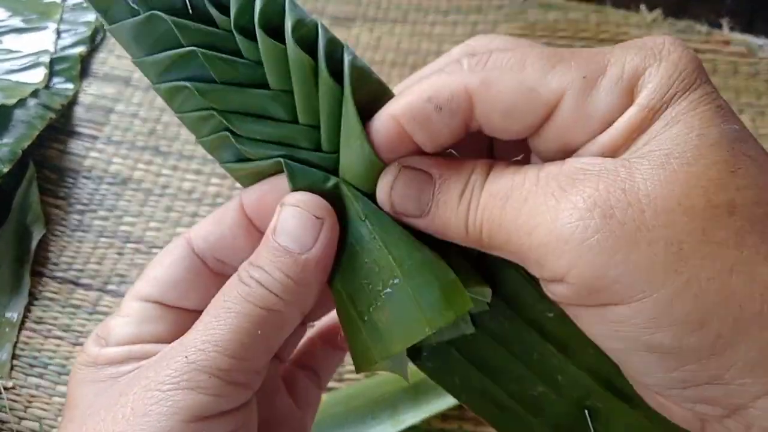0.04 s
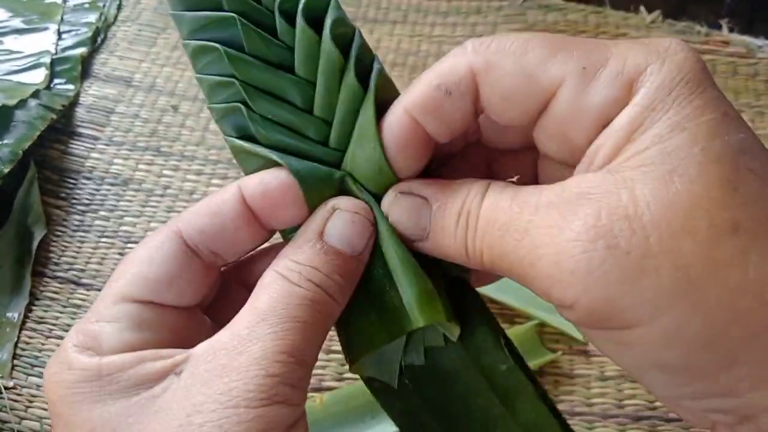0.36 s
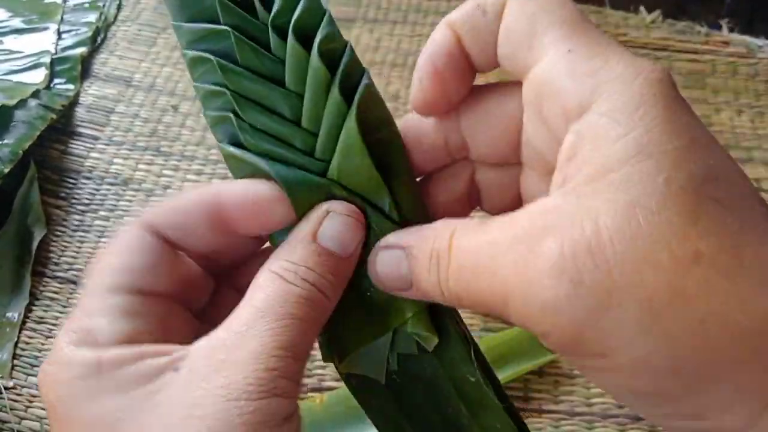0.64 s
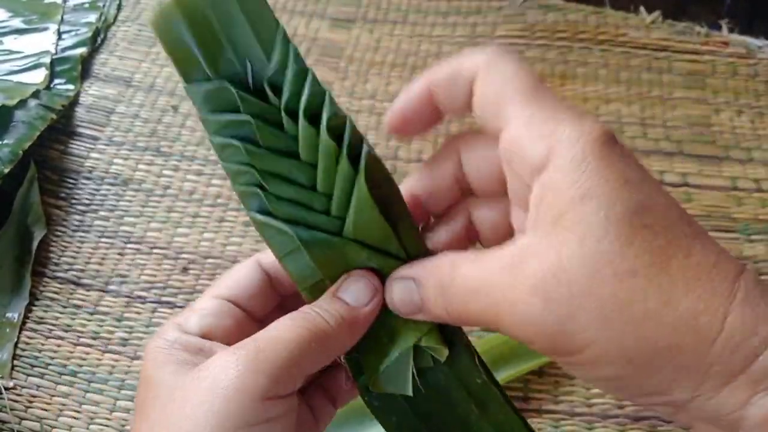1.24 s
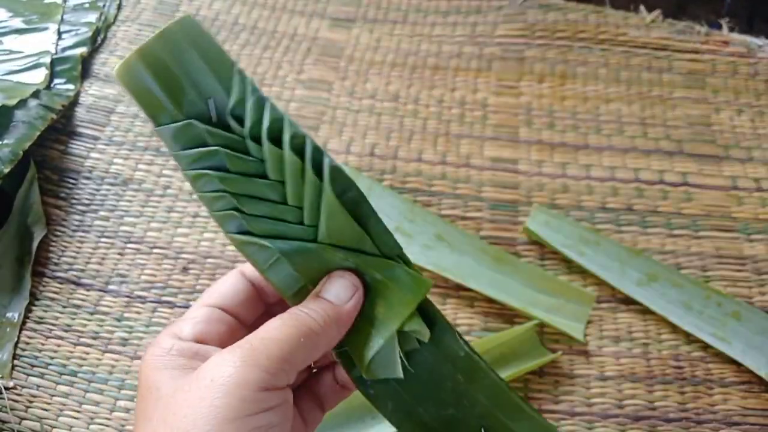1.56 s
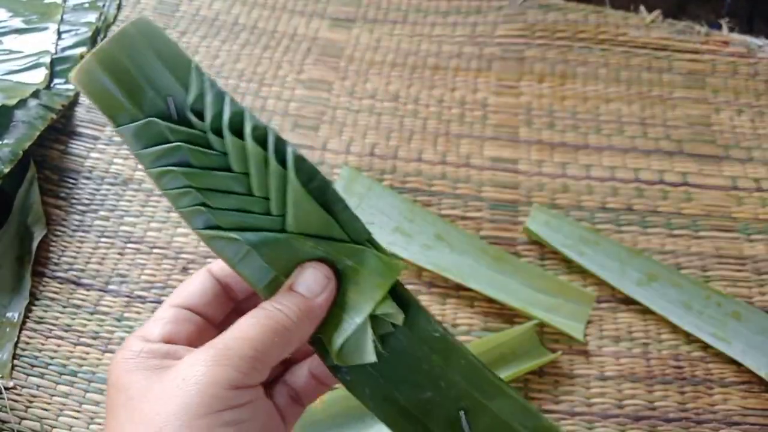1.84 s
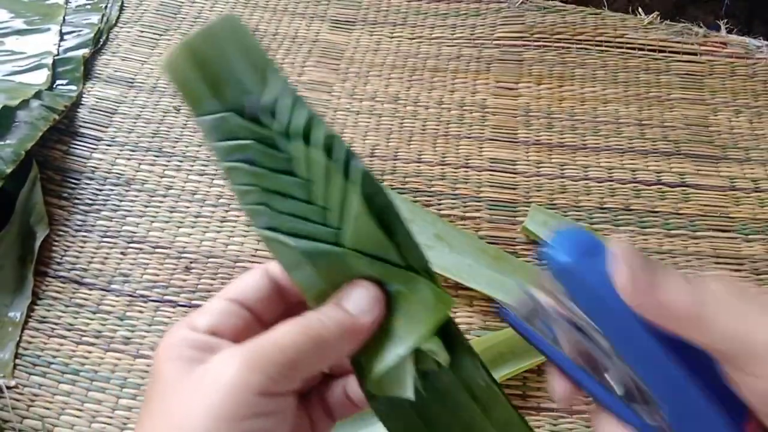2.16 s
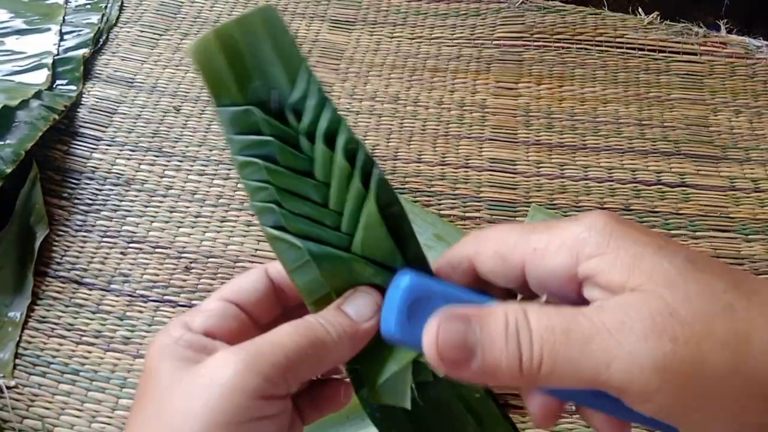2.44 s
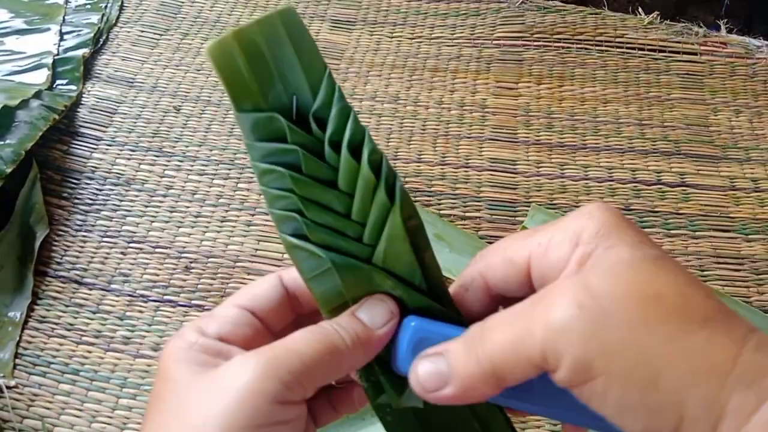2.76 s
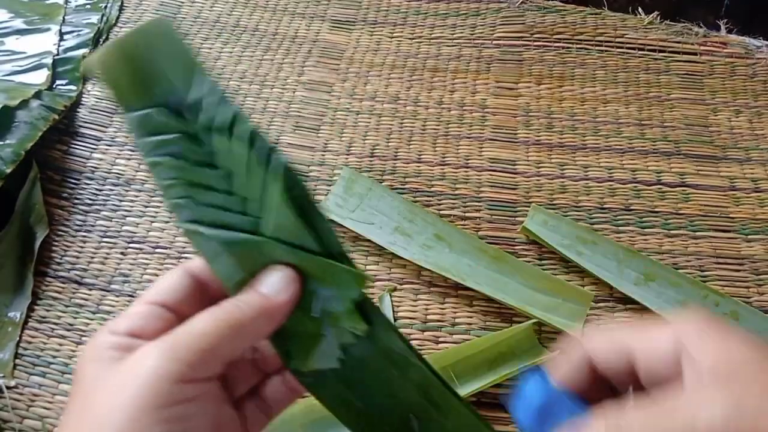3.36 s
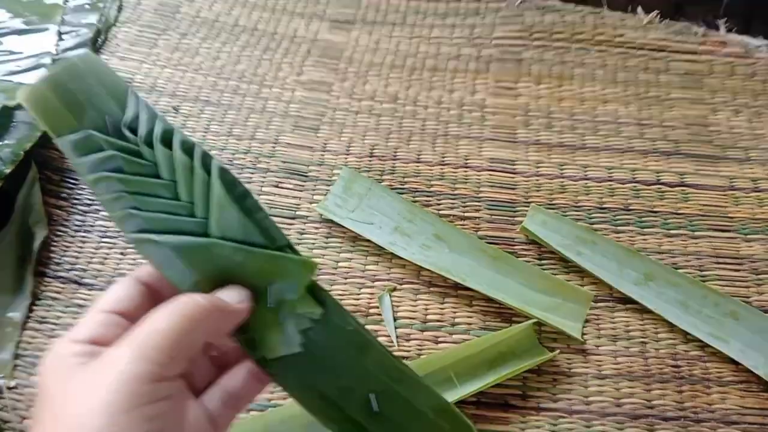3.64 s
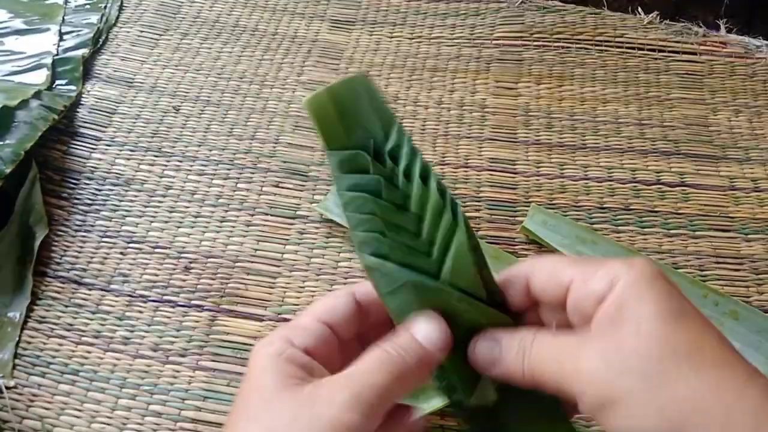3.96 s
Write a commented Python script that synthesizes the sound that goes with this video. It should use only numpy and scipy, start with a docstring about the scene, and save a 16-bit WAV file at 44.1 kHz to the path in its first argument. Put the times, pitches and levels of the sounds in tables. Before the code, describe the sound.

Close, sharp stapler snaps bite twice through a leaf after some light rustling, followed by a dull thump as the stapler lands on a mat. Far-off knocks like wood chopping sound now and then in the quiet room.

```python
"""Far-off wooden knocks, like chopping, and a leaf rustling between fingers open the scene.
Then, up close, a small hand stapler bites twice into the folded leaf: steel scrapes, gives way with a
crack that rings the shell, and springs back with a rattle. It is put down on a straw mat, and the floor
booms underneath. The distant wood is struck five times in all and rings on in the room after each blow.
Faint scuffs and a quiet hum and hiss sit behind everything."""
import sys
import numpy as np
from scipy import signal
from scipy.fft import rfft, irfft
from scipy.io import wavfile
from scipy.ndimage import uniform_filter1d, map_coordinates

SR = 44100
rng = np.random.default_rng(int(sys.argv[2]) if len(sys.argv) > 2 else 0)


def wav_out(sig):
    """Save sig, one row per channel (or a flat mono array), as 16-bit PCM at SR to the path in sys.argv[1]."""
    wavfile.write(sys.argv[1], SR, np.round(np.clip(np.atleast_2d(sig).T, -1, 1) * 32767).astype(np.int16))


N = 176400
T = np.arange(int(.6 * SR)) / SR  # seconds within one hit

# Stapler snaps. Each row: start in seconds, level in dB, crunch time in seconds,
# tilt in dB per octave, tail level in dB, scrape level in dB.
SNAPS = [(2.0439, -12.5, 0.0017, 7, -50.5, -35.5), (2.5587, -2, 0.00099, 0, -40, -33.5),
         (2.591, 1, 0.0035, 2.5, -15.5, -46.5), (2.807, 0, 0.0018, 1, -23.5, -23.5),
         (2.872, -20.5, 0.00072, 0.5, -35.5, -42), (2.9371, -2.5, 0.0009, -1.5, -45, -29.5),
         (2.965, -4.5, 0.0017, 4, -18, -35.5), (3.1611, 0.5, 0.0024, 1, -22.5, -20),
         (3.534, -14.5, 0.0035, 1, -40, -49), (3.595, -4, 0.0043, 0.5, -24.5, -54.5)]
# The tones of the stapler's shell and of its spring. Each row: pitch in Hz, level in dB.
SHELL_MODES = [(1560, -8.5), (2080, -2), (2650, -5), (6500, -7), (7150, -6.5)]
SPRING_MODES = [(2050, -8), (2114, -6.5), (2181, -11), (2676, -9), (7060, -11)]
# The colour of the crack, and of the scrape and rattle. Each row: frequency in Hz, gain in dB.
CRACK_EQ = [(100, -16.5), (900, -5), (2200, 8), (4600, -2), (6600, 2.5), (8500, -6), (13000, -18.5),
            (15300, -19)]
RATTLE_EQ = [(600, -24), (1300, -9), (2100, 3), (4600, -5), (7200, -3), (8300, -14.5), (13300, -30),
             (15300, -22)]
# Low thumps: the stapler's push as it bites, then its bumps on the mat.
# Each row: start in seconds, level in dB, slap offset in dB.
THUMPS = [(2.593, -30.5, -4), (3.488, -23.5, -11.5), (3.539, -20, -5.5), (3.614, -31, 10),
          (3.6319, -8.5, -2), (3.671, -24.5, 2)]
# The floor booming under the mat. Each row: pitch in Hz, level in dB, t60 in seconds.
FLOOR_MODES = [(126.3, 3, 0.18), (177.5, 9.5, 0.052)]
# The dull slap of a thump. Each row: frequency in Hz, gain in dB.
SLAP_EQ = [(60, -13.5), (200, 5), (480, -1), (1000, -19), (12000, -37)]
# Distant chops. Each row: start in seconds, noise level in dB, tilt in dB per octave, main note in Hz,
# note level in dB, ring level in dB, ring centre in Hz, t60 in seconds.
CHOPS = [(0.143, -18.5, -0.7, 820, -12.5, -20, 624, 0.26),
         (0.926, -17.5, -0.3, 960, -14.5, -20.5, 690, 0.24), (2.166, -17, 0.5, 932, -7, -14, 1300, 0.18),
         (3.005, -17, 1.9, 938, -9, -13.5, 1380, 0.27), (3.824, -11.5, 1.45, 941, -12, -9, 1500, 0.31)]
# The tones of the struck wood. Each row: pitch in Hz, level in dB.
WOOD_MODES = [(522, 0), (678, -10), (1132, -4), (1249, -4.5), (1780, -9), (1947, -4), (2055, -9),
              (2281, -4), (2324, -5), (4220, 5)]
# The colour of a chop's noise. Each row: frequency in Hz, gain in dB.
CHOP_EQ = [(60, -12.5), (120, -3), (270, -15), (550, -0.5), (1250, 2.5), (1600, -3), (1950, 4), (2600, -8),
           (7200, -13), (8300, -23), (13000, -36)]
# Leaf rustles. Each row: peak time, rise and fall time constants, all in seconds, then level in dB.
RUSTLES = [(.334, 0.0074, 0.012, -27.5), (.49, 0.049, 0.063, -48.5), (0.563, 0.0046, 0.02, -36),
           (.71, 0.043, 0.066, -48), (1.19, 0.047, 0.022, -48), (1.58, 0.11, 0.048, -57.5),
           (2.045, 0.025, 0.012, -36), (2.48, 0.052, 0.11, -48.5), (3.43, 0.0045, 0.12, -48.5)]
# The leaf creasing. Each row: start in seconds, level in dB.
CREASES = [(0.332, -21), (0.345, -26.5), (.8442, -45.5), (1.017, -36), (1.049, -42)]
# The leaf's papery top end. Each row: frequency in Hz, gain in dB.
LEAF_EQ = [(1800, -25), (3500, 0), (7000, 19), (8300, -1.5), (10500, 10), (13000, -46), (15300, -4)]
# Faint scuffs. Each row: start and fall time in seconds, centre in Hz, half-width in octaves, level in dB.
SCUFFS = [(1.099, 0.095, 1335, 0.18, -37), (1.24, 0.047, 3210, 0.12, -46.5), (1.434, 0.027, 616, 0.2, -28),
          (1.805, 0.059, 1210, 0.42, -40.5), (1.913, 0.013, 2090, 0.087, -29.5),
          (2.004, 0.026, 2210, 0.089, -33), (2.401, 0.076, 2050, 0.12, -35)]
# The room's reverb time. Each row: frequency in Hz, t60 in seconds.
ROOM_DECAY = [(200, 0.36), (2200, 0.25)]
# The colour of the room's hum and hiss. Each row: frequency in Hz, gain in dB.
ROOM_TONE_EQ = [(50, 5), (105, 5.5), (200, -2.5), (700, -8.5), (2500, -18.5), (7000, -14.5), (8300, -27),
                (13000, -41), (15500, -20.5)]
# The fader on that hum and hiss. Each row: time in seconds, level in dB.
ROOM_TONE_FADER = [(2.2, -51.5), (3.301, -57)]


def stapler():
    """Steel scrapes, crunches and gives way, ringing the shell; spring and room rattle on just after."""
    out = np.zeros(N)
    for start, db, crunch_s, tilt, tail_db, scrape_db in SNAPS:
        scrape = grainy(noise(RATTLE_EQ, tilt, ripple_db=2.5), depth=.3) * np.exp(-T / 0.0084)
        add(out, start - len(T) / SR, amp(scrape_db) * scrape[::-1])  # reversed: swells into the snap
        build = amp(-13 * np.maximum(1 - T / crunch_s, 0))  # climbs 13 dB through the crunch
        add(out, start, amp(db - 4.5) * noise(CRACK_EQ, tilt) * build * fade(0.018, T - crunch_s))
        shell_modes = [(hz, level + tilt * np.log2(hz / 3500), 0.021) for hz, level in SHELL_MODES]
        shell = ring(shell_modes, scatter_db=2) * attack(crunch_s / 2)
        add(out, start + crunch_s / 2, amp(db - 6) * shell)
        spring_modes = [(hz, level + tilt * np.log2(hz / 7000), .25) for hz, level in SPRING_MODES]
        spring = ring(spring_modes, scatter_db=2.5, waver=.5)
        rattle = grainy(room_decay(noise(RATTLE_EQ, tilt, ripple_db=1)), depth=.3)
        gate = attack(0.0011) * np.exp(-(T / .13) ** 4)  # the tail shuts rather abruptly
        add(out, start + 0.011, amp(tail_db) * (rattle + spring) * gate)
    return out


def low_thumps():
    """The stapler's push as it bites, then its bumps on the mat: each a slap, a rumble and a boom."""
    out, rise_s = np.zeros(N), .002
    boom = sum(amp(db) * fade(t60) * np.sin(2 * np.pi * hz * T) for hz, db, t60 in FLOOR_MODES)
    slap_and_rumble = fade(0.063) + amp(-14.5) * fade(0.27)
    for start, db, slap_db in THUMPS:
        add(out, start, amp(db) * boom * attack(rise_s))
        add(out, start - rise_s, amp(db + slap_db) * noise(SLAP_EQ) * slap_and_rumble)
    return out


def distant_chops():
    """A light first touch, two hard bites, then the wood rings on in the room."""
    out, ring_octaves = np.zeros(N), 0.62  # tones this far from the ring centre lose 6 dB
    for start, db, tilt, note_hz, note_db, ring_db, centre_hz, t60 in CHOPS:
        modes = [(hz, level + ring_db - 6 * (np.log2(hz / centre_hz) / ring_octaves) ** 2, t60)
                 for hz, level in WOOD_MODES]
        note = ring([(note_hz, note_db, t60)], scatter_db=1, waver=0.53) * attack(0.033)
        wash = amp(db) * room_decay(noise(CHOP_EQ, tilt, ripple_db=3))
        wood = ring(modes, scatter_db=4, waver=1)
        add(out, start, note + (wash + wood) * attack(0.0037))
        touch = noise(CHOP_EQ, tilt - 1) * np.minimum(T / 0.008, 1) * fade(0.17)
        add(out, start - .011, amp(db - 8) * touch)
        for delay_s, bite_db in (0, -2.5), (0.0105, -3):
            add(out, start + delay_s, amp(db + bite_db) * noise(CHOP_EQ, tilt - 1) * fade(0.04))
    return out


def leaf():
    """Grainy swells as the leaf slides between the fingers, and dry ticks where it creases."""
    out, t = np.zeros(N), np.arange(N) / SR
    for peak, rise, fall, db in RUSTLES:
        swell = np.exp(-np.maximum((peak - t) / rise, (t - peak) / fall))
        out += amp(db) * swell * noise(LEAF_EQ, ripple_db=1.5, size=N)
    out = grainy(out, depth=0.4)
    for start, db in CREASES:
        add(out, start, amp(db) * noise(LEAF_EQ, tilt=3.6) * fade(.01))
    return out


def scuffs():
    """Faint rubs and knocks, each sounding one narrow resonance."""
    out, hz = np.zeros(N), np.fft.rfftfreq(len(T), 1 / SR)
    for start, fall_s, centre_hz, octaves, db in SCUFFS:
        band = 1 / (1 + (np.log2((hz + 1) / centre_hz) / octaves) ** 2)
        rub = unit(irfft(rfft(rng.standard_normal(len(T))) * band, len(T)))
        add(out, start, amp(db) * rub * attack(fall_s / 2) * np.exp(-T / fall_s))
    return out


def room_tone():
    """A bed of hum and hiss that sinks a little in the second half."""
    level_db = np.interp(np.arange(N) / SR, *np.transpose(ROOM_TONE_FADER))
    return amp(level_db) * noise(ROOM_TONE_EQ, size=N)


def room_decay(x):
    """Fades x the way the room does: the highs die sooner than the lows."""
    hz, t, spectrum = signal.stft(x, SR, nperseg=256)
    t60 = curve_at(ROOM_DECAY, hz)[:, None]
    return signal.istft(spectrum * fade(t60, t), SR, nperseg=256)[1][:len(x)]


def ring(modes, scatter_db, waver=0):
    """Damped tones (Hz, dB, t60), new at each blow; waver makes them beat as they cross the room."""
    def drift():
        return waver * map_coordinates(rng.standard_normal(128), [T * 52])  # 52 random points a second

    out = np.zeros(len(T))
    for hz, db, t60 in modes:
        gain = amp(db + scatter_db * rng.normal() + 2.5 * drift())
        out += gain * fade(t60) * np.sin(2 * np.pi * (hz * T + rng.random()) + drift())
    return out


def noise(eq, tilt=0, ripple_db=0, size=len(T)):
    """Noise of rms 1 with an EQ curve, a tilt in dB per octave and a ripple of many small resonances."""
    hz = np.fft.rfftfreq(size, 1 / SR)
    ripple = map_coordinates(rng.standard_normal(1024), [hz / 128.3])  # a random point every 128.3 Hz
    gain = amp(curve_at(eq, hz) + tilt * np.log2(hz + 20) + ripple_db * ripple * np.minimum(hz / 2000, 1))
    return unit(irfft(rfft(rng.standard_normal(size)) * gain, size))


def grainy(x, depth):
    """Breaks x into grains about a millisecond long."""
    flutter = unit(uniform_filter1d(rng.standard_normal(len(x)), size=50))
    return x * unit(np.exp(depth * flutter))


def attack(rise_s):
    """Fades in with time constant rise_s."""
    return 1 - np.exp(-T / rise_s)


def fade(t60, t=T):
    """Falls by 60 dB in t60 seconds, full before time zero."""
    return np.exp(-np.log(1000) * np.maximum(t, 0) / t60)


def curve_at(points, hz):
    """Reads (Hz, value) points on a log frequency axis."""
    point_hz, values = np.transpose(points)
    return np.interp(np.log(hz + 1), np.log(point_hz + 1), values)


def amp(db):
    """Decibels to gain."""
    return 10 ** (np.asarray(db) / 20)


def unit(x):
    """Scales to rms 1."""
    return x / np.sqrt(np.mean(x ** 2) + 1e-20)


def add(track, start, x):
    """Mixes x into the track at start seconds."""
    i = round(start * SR)
    track[i:i + len(x)] += x[:N - i]


def scene():
    """The mono mix: every source laid over the room tone."""
    return (room_tone() + distant_chops() + stapler() + low_thumps() + leaf() + scuffs())[None]


def record(dry):
    """The microphone sheds the deepest bass, rounds off the loudest peaks and loses the very top."""
    low_cut_hz, ceiling, top_hz = 62, 0.79, 15600
    thin = signal.sosfilt(signal.butter(2, low_cut_hz, "high", fs=SR, output="sos"), dry)
    rounded = thin / (1 + np.abs(thin / ceiling) ** 6) ** (1 / 6)
    passband = np.fft.rfftfreq(2 * N, 1 / SR) < top_hz
    return irfft(rfft(rounded, 2 * N) * passband)[:, :N]


dry = scene()
out = record(dry)
wav_out(out)
```